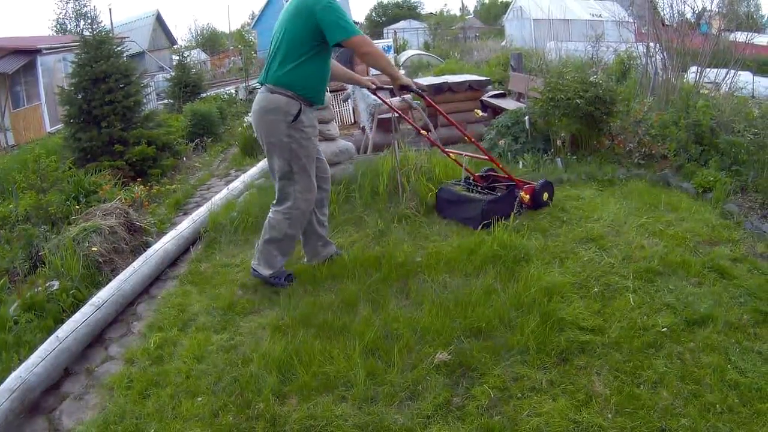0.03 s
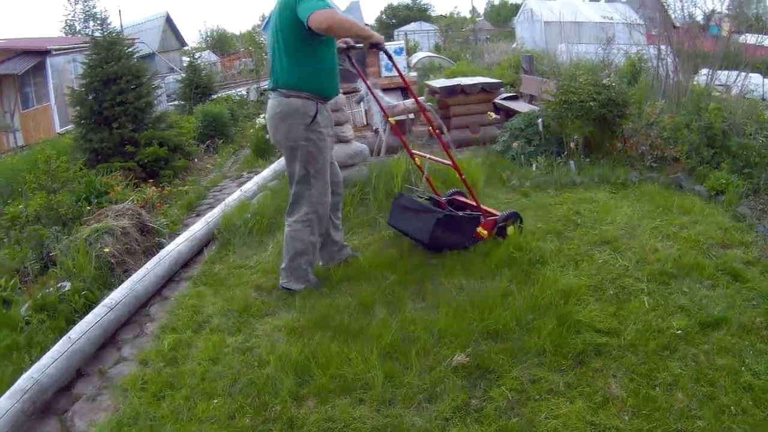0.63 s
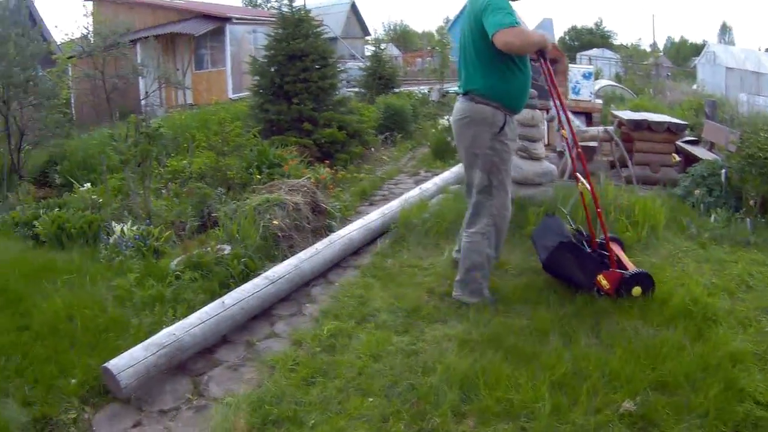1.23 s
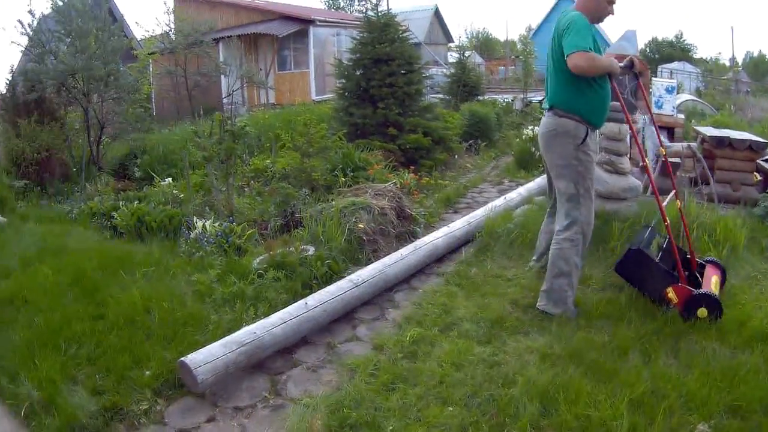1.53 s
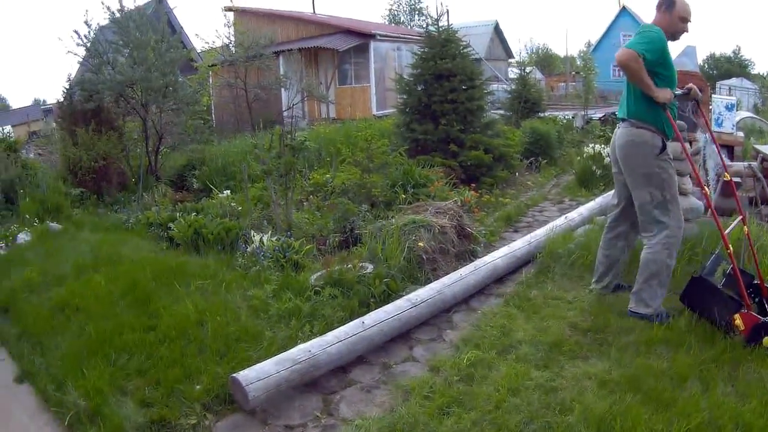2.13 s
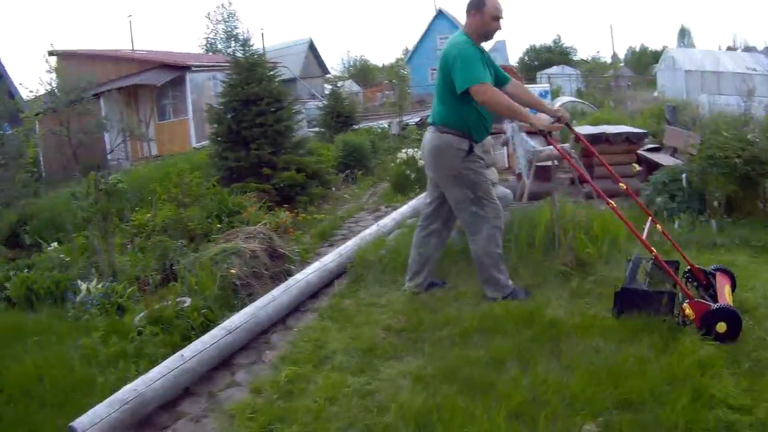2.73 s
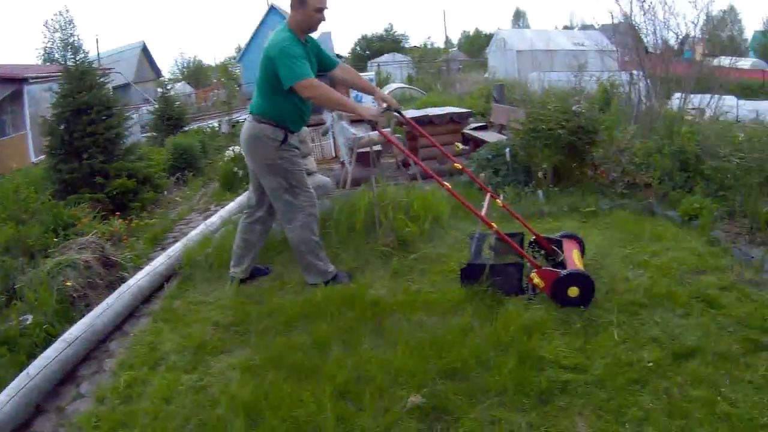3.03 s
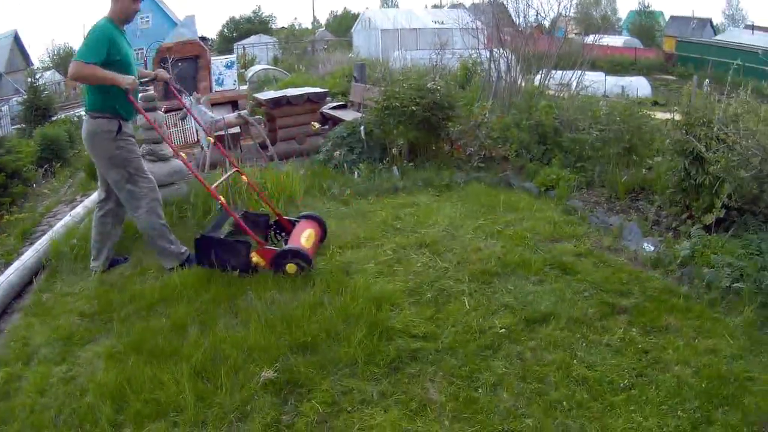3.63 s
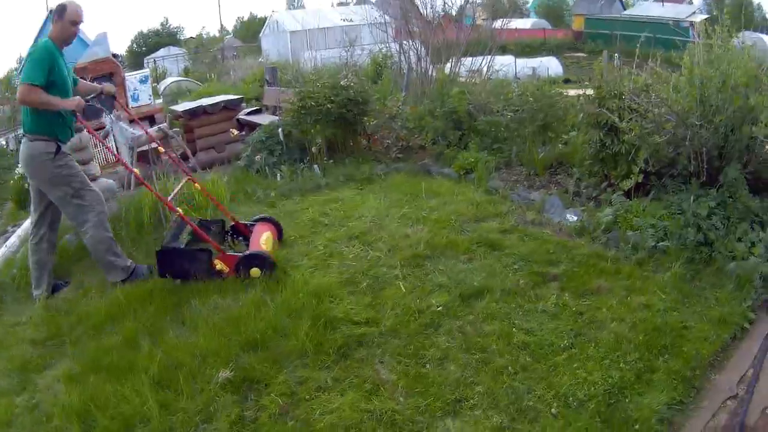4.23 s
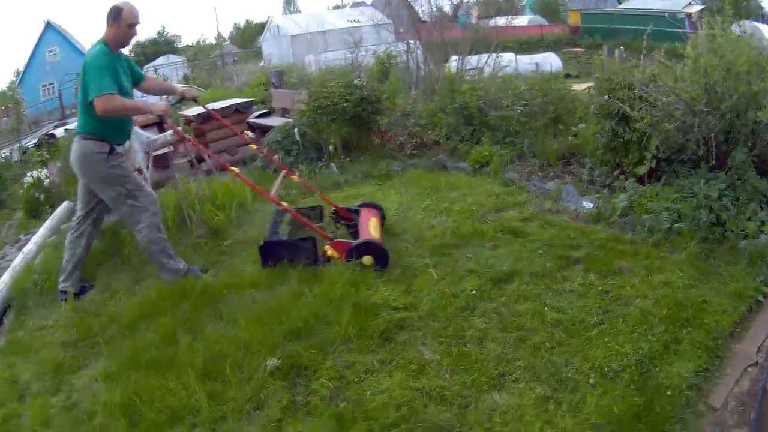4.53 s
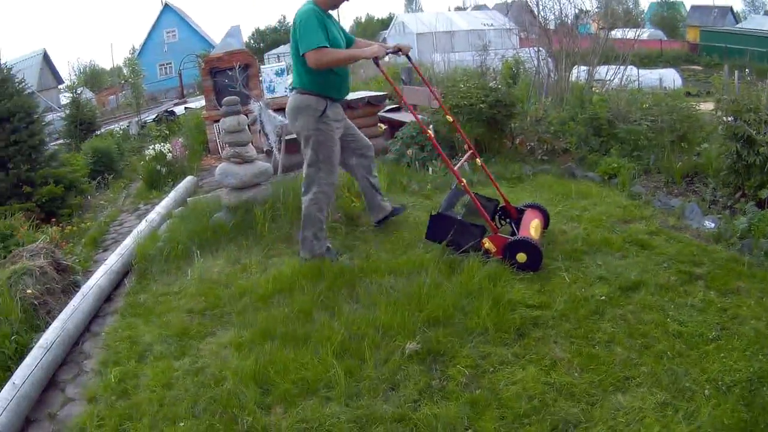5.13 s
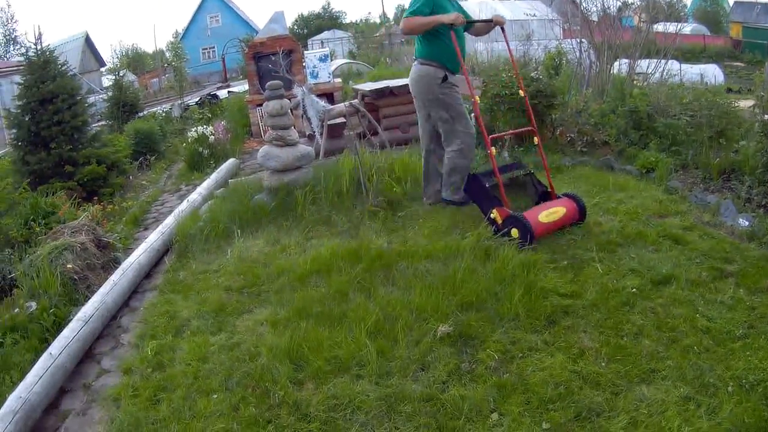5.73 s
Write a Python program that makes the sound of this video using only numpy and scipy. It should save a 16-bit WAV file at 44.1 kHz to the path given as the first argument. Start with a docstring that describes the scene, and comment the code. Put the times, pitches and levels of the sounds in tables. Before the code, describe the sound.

Short pushes of a manual reel mower: metallic blade scraping, rattling gears and ratchet clicks, with brief lulls between strokes.

```python
"""A hand-pushed reel mower on a quiet garden lawn, a few metres from a nearly mono microphone.
A puff of wind opens; then comes a first push: wheels and gears rattle the housing, the reel scrapes the
bed knife and snips grass. The mower pivots at 1.3 s, makes a long push from 2.2 s and coasts, its ratchet
clicking. It is drawn back at 3.5 s and pushed once more at 4 s, as wind touches the microphone again.
Ratchet and loose handle knock along the way, and a few last times as the mower comes to rest."""
import sys
import numpy as np
from scipy import signal
from scipy.fft import rfft, irfft
from scipy.io import wavfile
from scipy.ndimage import uniform_filter1d

SR = 44100
rng = np.random.default_rng(int(sys.argv[2]) if len(sys.argv) > 2 else 0)


def int16_out(signal):
    """Quantize to a 16-bit WAV file."""
    q = np.round(np.clip(np.atleast_2d(signal).T, -1, 1) * 32767)
    wavfile.write(sys.argv[1], SR, q.astype(np.int16))


N = 255780
TIME = np.arange(N) / SR
BINS = np.fft.rfftfreq(8192, 1 / SR)

# spectra of the garden's hush and of wind on the microphone: frequency_hz, gain_db
GARDEN_SPECTRUM = [(12, -36), (20, -7), (44, -5.5), (103, -10), (167, -16), (263, -14), (317, -13),
                   (812, -19), (1120, -14.5), (1280, -24), (5310, -26.5), (6760, -25.5), (12200, -27),
                   (15900, -73), (22000, -120)]
WIND_SPECTRUM = [(12, -14), (20, -3), (41, -0.5), (65, -8.5), (102, -6.5), (145, -17.5), (170, -5.5),
                 (220, -51), (370, -120)]
# wind reaching the microphone: start_s, relative_db
WIND_PUFFS = [(0.0, -46), (3.52, -59), (4.609, -44), (4.695, -45), (5.12, -65)]
# spectrum of the faint side signal: frequency_hz, side_over_mid_db
SIDE_SPECTRUM = [(300, -95), (600, -41.5), (1200, -13.5), (2200, -73), (4000, -23), (5300, -19.5),
                 (7000, -74)]

# mower and catcher brush the grass without cutting: start_s, length_s, level_db
GRASS_BRUSHES = [(0.0, 0.41, -66), (1.177, 0.1, -57), (1.991, 0.2, -59.5), (3.253, 0.46, -47.5),
                 (5.413, 0.57, -64)]
# the handle hits its stops or the ratchet catches: start_s, relative_clack_db, relative_thud_db
HANDLE_KNOCKS = [(0.87, -32.5, -51), (1.011, -51, -63.5), (1.564, -46.5, -45.5), (2.198, -53, -37),
                 (2.664, -27, -41), (2.794, -26, -32), (2.846, -24, -33), (3.355, -34.5, -55),
                 (3.511, -37, -36), (3.801, -36.5, -39.5), (4.054, -43, -41), (4.621, -34.5, -32),
                 (5.417, -53, -46), (5.467, -53.5, -52), (5.572, -42.5, -47), (5.626, -43.5, -43.5),
                 (5.759, -47.5, -51)]
# a blade bites a thick tuft: start_s, relative_blade_db, relative_jolt_db
TUFT_SNIPS = [(0.368, -33, -41), (0.424, -29, -30), (0.482, -27.5, -32.5), (0.5249, -26, -39),
              (0.6, -27.5, -36), (0.6614, -26, -41), (0.71, -21, -28), (0.832, -25.5, -39.5),
              (0.8644, -25.5, -44), (0.933, -34.5, -55), (2.336, -30.5, -29.5), (2.441, -27, -33),
              (2.545, -26, -33), (2.5782, -24, -39), (2.6934, -20.5, -26), (2.7728, -23.5, -20),
              (2.805, -27, -40), (2.955, -26, -33.5), (3.0564, -30.5, -40), (3.088, -30.5, -48),
              (3.131, -33, -43), (3.209, -32, -34), (3.522, -31, -34), (3.567, -25, -35),
              (3.628, -27, -30.5), (3.67, -25.5, -38), (3.7475, -24.5, -36), (3.777, -28, -35.5),
              (4.09, -28.5, -40), (4.29, -19, -31), (4.321, -21, -44), (4.362, -26, -38),
              (4.391, -22.5, -35), (4.4884, -20.5, -38)]
# blades passing the bed knife: time_s, passes_per_s
REEL_SPEED = [(0, 23), (.3, 23.5), (.6, 48), (.75, 40.5), (1.0, 18), (2.2, 18.7), (2.45, 30.6), (2.6, 65),
              (2.82, 40.7), (3.02, 26.4), (3.3, 17), (3.7, 31), (4.05, 21.6), (4.4, 49), (5, 40)]
# how hard the mower is driven, one curve a stroke: time_s, effort_db
FIRST_PUSH = [(0.0, -43), (0.038, -51.5), (0.306, -54.5), (0.416, -37.5), (0.536, -34), (0.634, -35),
              (0.676, -31.5), (0.854, -38.5), (0.87, -35), (0.922, -50.5), (0.93, -43.5), (1.1, -69)]
PIVOT = [(1.28, -65.5), (1.34, -43.5), (1.484, -43), (1.596, -58), (1.618, -50.5), (1.646, -45),
         (1.776, -61.5), (1.85, -77)]
LONG_PUSH = [(2.17, -66), (2.21, -50), (2.446, -31), (2.496, -37), (2.584, -25), (2.626, -29.5),
             (2.808, -30), (2.878, -36.5), (2.922, -28.5), (3.018, -40.5), (3.224, -40.5), (3.3, -51)]
DRAW_BACK = [(3.49, -47.5), (3.534, -36.5), (3.624, -40), (3.628, -36), (3.74, -39.5), (3.752, -35.5),
             (3.858, -46.5), (3.95, -67.5)]
LAST_PUSH = [(4.02, -58.5), (4.094, -33.5), (4.158, -35), (4.278, -28.5), (4.45, -31), (4.486, -28.5),
             (4.578, -34.5), (4.668, -35), (4.722, -43.5), (4.84, -41.5), (5.1, -81.5)]

# resonances of the mower's parts: pitch_hz, base_width_hz, gain_db
RATCHET_MODES = [(1010, 230, -9.5), (1280, 240, -1.5), (1680, 140, -15), (1900, 82, -3)]
HOUSING_MODES = [(213, 62, -9.5), (330, 54, -7), (506, 125, -9), (581, 60, -0.5), (621.4, 17, 5),
                 (898, 58, -6), (1116, 410, -10.5), (1323, 51, -3.5), (1500, 67, -10.5), (1713, 21, -7),
                 (1856, 31, -7.5), (2080, 37, -8), (2394, 37, -7.5), (2490, 38, -11.5), (2837, 11, -14)]
BLADE_MODES = [(3790, 40, -4), (3930, 60, -16), (4790, 39, -0.5), (4930, 54, -2.5), (5640, 130, -12),
               (6640, 280, -4.5), (7590, 160, -5), (8640, 54, -9), (8830, 180, -7), (9860, 230, -4.5),
               (10120, 70, -2), (10500, 110, -10), (11700, 160, -6)]
# colour of the scrape at the microphone, for each heading of the mower: frequency_hz, gain_db
AWAY = [(1530, -18.5), (2600, -4.5), (2790, -38), (3140, -9.5), (3690, -12.5), (4090, -1.5), (4650, -13),
        (5540, -2), (6640, -3), (7270, 3), (8120, -5.5), (8720, 2), (10200, -2), (11000, -7), (12200, -15),
        (15900, -26), (22000, -120)]
PIVOTING = [(1530, -18), (2600, 7.5), (2690, -15), (2850, -2), (3320, -10), (3620, -1), (4140, -6),
            (4810, -2), (5370, -5), (5760, 0), (6950, -2.5), (7910, -6), (10100, -8.5), (11700, -22),
            (12200, -16), (15900, -40), (22000, -120)]
TURNED = [(1530, -20.5), (2600, -7), (2960, -14), (3350, -10), (3880, -2.5), (4360, -8.5), (4810, -2.5),
          (5230, -8), (6600, -2), (7130, -6), (7660, -4), (8330, -9.5), (10000, 5.5), (11700, -2.5),
          (12200, -6), (15900, -13), (22000, -120)]
DRAWN_BACK = [(1530, -74), (2600, -26), (2790, -32), (3140, -21.5), (3860, -7), (4680, -13.5), (5870, -1),
              (6390, -8), (7560, -4.5), (8220, -11), (8770, -1.5), (9420, -4.5), (9600, 6.5), (10200, 4.5),
              (12200, -11.5), (15900, -30), (22000, -120)]
ACROSS = [(1530, -49), (2600, -5), (3000, -25), (3320, -16.5), (3830, -7), (4280, -9.5), (4780, -7),
          (5230, -7.5), (6350, -3), (7130, -6), (8280, -12), (9920, 4.5), (10900, -5), (11700, -4),
          (12200, -17), (15900, -36), (22000, -120)]
# each heading turns other parts to the microphone:
# start_s, colour, boom_db, gears_db, scrape_db, sheen_db, whirr_db
HEADINGS = [(0, AWAY, -5.5, -3, 0, 0, -0.5), (1.15, PIVOTING, 4.5, 1, 1, -3, -2),
            (2.15, TURNED, 3.5, 2, 0, -4.5, 2), (3.2, DRAWN_BACK, -3, -2.5, 0, -1, -15),
            (3.97, ACROSS, -1, -0.5, -0.5, -1, -5.5)]

# how each part follows the effort: firm_push_db, db_per_effort_db
WHEELS, BUMPS, GEARS = (-49.5, 0.7), (-43.7, 1), (-41.5, 0.97)
SCRAPE, SHEEN, PINIONS = (-40, 1.13), (-40, 1), (-51, 1)


def amp(db):
    """Decibels to gain."""
    return 10 ** (np.asarray(db) / 20)


def unit_rms(x):
    """Scales to rms 1."""
    return x / np.sqrt(np.mean(x ** 2) + 1e-20)


def spectrum(points, hz=BINS):
    """A spectrum table as gain at the given frequencies."""
    points_hz, db = np.transpose(points)
    return amp(np.interp(np.log(hz + 1), np.log(points_hz + 1), db))


def ringing(modes, widen):
    """Summed gain of a set of resonances, their widths multiplied by widen."""
    powers = (amp(db) ** 2 / (1 + (2 * (BINS - hz) / (width * widen)) ** 2) for hz, width, db in modes)
    return np.sqrt(sum(powers))


def below(edge_hz, order):
    """Gain of a low-pass."""
    return 1 / np.sqrt(1 + (BINS / edge_hz) ** (2 * order))


def above(edge_hz, order):
    """Gain of a high-pass."""
    return np.sqrt(1 - below(edge_hz, order) ** 2)


def through(x, gain):
    """Causal filter of unit energy: resonances ring after each blow."""
    log_gain = np.log(np.maximum(gain / gain.max(), 1e-5))
    mirrored = np.concatenate([log_gain, log_gain[-2:0:-1]])
    minimum_phase = np.exp(np.conj(signal.hilbert(mirrored)))
    response = np.fft.ifft(minimum_phase).real[:len(BINS)]
    return signal.oaconvolve(x, response / np.linalg.norm(response))[:N]


def wander(rate_hz):
    """Random drift of rms 1, mostly slower than rate_hz."""
    hz = np.fft.rfftfreq(N, 1 / SR)
    return unit_rms(irfft(rfft(rng.standard_normal(N)) / (1 + (hz / rate_hz) ** 4), N))


def grains(per_s, spread_db, smooth):
    """Tiny impacts of scattered size over a share of smooth friction noise."""
    sizes = amp(spread_db * np.minimum(rng.exponential(1, N), 3)) * rng.choice([-1, 1], N)
    impacts = unit_rms(sizes * (rng.random(N) < per_s / SR))
    return unit_rms(impacts + smooth * rng.standard_normal(N))


def pulses(starts_s, levels_db, length_s, rise_s, order):
    """Envelope of pulses that rise quickly and let go, more abruptly at a higher order."""
    power = np.zeros(N)
    for start, db, length in np.broadcast(starts_s, levels_db, length_s):
        span = slice(max(round(start * SR), 0), round(start * SR) + SR // 2)
        age = np.maximum(TIME[span] - start, 0)
        shape = (1 - np.exp(-age / rise_s)) * np.exp(-(age / max(length, rise_s)) ** order)
        power[span] += (amp(db) * shape / (shape.max() + 1e-12)) ** 2
    return np.sqrt(power)


def garden_air():
    """Low puffs of wind on the microphone, over the steady hush of the garden."""
    gusts = pulses(*np.transpose(WIND_PUFFS), length_s=0.052, rise_s=0.0044, order=1)
    wind = amp(5) * gusts * through(rng.standard_normal(N), spectrum(WIND_SPECTRUM))
    hush = amp(-64) * through(rng.standard_normal(N), spectrum(GARDEN_SPECTRUM))
    return wind + hush


def grass_brushing():
    """Grass swishes along the catcher: a thin, high, uneven rustle."""
    start_s, length_s, level_db = np.transpose(GRASS_BRUSHES)
    contact = pulses(start_s, level_db, length_s, rise_s=0.0016, order=4)
    swish = contact * grains(per_s=1700, spread_db=4.5, smooth=0.4) * amp(2 * wander(30))
    return through(swish, above(8800, order=12) + above(4500, order=2))


def pawl_clicks(start_s, count, first_gap_s=0.032, slowing=0.06, fade_db_per_s=60):
    """Times and levels of the pawl clicking over the coasting reel, ever slower and softer."""
    age = first_gap_s * ((1 + slowing) ** np.arange(count) - 1) / slowing
    return start_s + age, -34.5 - fade_db_per_s * age


def knocks():
    """The pawl drops and the handle hits its stops: a dry clack and a thud of the deck."""
    start_s, clack_db, thud_db = np.transpose(HANDLE_KNOCKS)
    all_clacks = np.hstack([(start_s, clack_db), pawl_clicks(start_s=3.172, count=5)])
    clack = pulses(*all_clacks, length_s=0.0098, rise_s=0.00067, order=1) * rng.standard_normal(N)
    thud = pulses(start_s, thud_db, length_s=0.017, rise_s=0.0014, order=1) * rng.standard_normal(N)
    pawl = ringing(RATCHET_MODES, widen=0.91) * below(1900, order=2) * above(500, order=3)
    deck = ringing(HOUSING_MODES, widen=0.71) * below(470, order=2) * above(237, order=3)
    return amp(-4) * (through(clack, pawl) + through(thud, deck))


def effort(firm_db=-35, rest_db=-72):
    """Effort along the strokes, in dB against a firm push."""
    time_s, effort_db = np.vstack([FIRST_PUSH, PIVOT, LONG_PUSH, DRAW_BACK, LAST_PUSH]).T
    return np.interp(TIME, time_s, effort_db, right=rest_db) - firm_db


def heading():
    """Which way the mower faces at each moment, as a row number of HEADINGS."""
    return np.searchsorted([row[0] for row in HEADINGS[1:]], TIME)


def drives(push_db):
    """Gain of each moving part, from the effort and (wheels apart) the heading."""
    stepped_db = np.array([row[2:] for row in HEADINGS], float)[heading()]
    facing_db = uniform_filter1d(stepped_db, size=4000, axis=0).T
    parts = zip([WHEELS, BUMPS, GEARS, SCRAPE, SHEEN, PINIONS], [0, *facing_db])
    return [amp(db + slope * push_db + turn_db) for (db, slope), turn_db in parts]


def reel_speed():
    """Blade passes per second."""
    return np.interp(TIME, *np.transpose(REEL_SPEED))


def pinion_whirr(drive, base_hz=1441, cycles_per_pass=14, width_hz=94):
    """Loose pinion teeth mesh unevenly: a fuzzy tone that rises with the speed of the reel."""
    phase = 2 * np.pi * np.cumsum(base_hz + cycles_per_pass * reel_speed()) / SR
    return drive * (wander(width_hz) * np.cos(phase) + wander(width_hz) * np.sin(phase))


def housing(wheels, bumps, gears, jolts):
    """Wheels rumble, bumps boom in the hollow deck, gear teeth and blade jolts clatter higher up."""
    body = ringing(HOUSING_MODES, widen=1) * below(3460, order=7) * above(134, order=4)
    rolling = wheels * grains(per_s=900, spread_db=2, smooth=0.32)
    bumping = bumps * grains(per_s=700, spread_db=2.6, smooth=0.83) * amp(2.08 * wander(42))
    teeth = np.hypot(gears, amp(-7) * jolts) * grains(per_s=1400, spread_db=2.2, smooth=0.59)
    rumble = through(rolling, body * below(430, order=6))
    boom = through(bumping, body * above(456, order=7) * below(713, order=8))
    clatter = through(teeth, body * above(737, order=8))
    return rumble + boom + clatter


def snips(push_db, stalk_db=-31.5, scatter_db=2):
    """Force of the cuts on blade and gears: thick tufts, and thin stalks at every blade pass."""
    passes = np.cumsum(reel_speed()) / SR
    cuts = np.flatnonzero(np.diff(np.floor(passes)))
    cut_db = stalk_db + push_db[cuts] + scatter_db * rng.standard_normal(N)[:len(cuts)]
    stalks = pulses(TIME[cuts], cut_db, length_s=0.0067, rise_s=0.00033, order=2)
    start_s, blade_db, jolt_db = np.transpose(TUFT_SNIPS)
    tufts, jolts = [pulses(start_s, db, length_s=0.01, rise_s=0.00033, order=2)
                    for db in (blade_db, jolt_db)]
    return np.hypot(stalks, tufts), jolts


def blade_passes(depth, uneven):
    """Each blade meets the bed knife hard and slides off; no two press alike."""
    passes = np.cumsum(reel_speed()) / SR
    pressure = 1 + uneven * rng.standard_normal(N)[passes.astype(int)]
    contact = np.exp(depth * pressure * (0.5 - passes % 1))
    return unit_rms(uniform_filter1d(contact, size=40))


def sliding(x, patchy_db):
    """The contact point runs along the blade, so the bands swell and fade in patches."""
    bands = signal.stft(x, nperseg=256, noverlap=192)[2]
    drift = uniform_filter1d(rng.standard_normal(bands.shape), size=12, axis=1)
    patches = unit_rms(uniform_filter1d(drift, size=4, axis=0))
    swell = unit_rms(amp(patchy_db * patches))
    return signal.istft(bands * swell, nperseg=256, noverlap=192)[1][:N]


def reel(scrape, sheen, bites):
    """Steel slides on steel and stalks snap; the blades ring, coloured by the heading of the mower."""
    steel = np.hypot(1, amp(10) * ringing(BLADE_MODES, widen=0.37))
    steel /= uniform_filter1d(steel, size=130)  # fine peaks only: the heading sets the broad balance
    rub = np.hypot(scrape, amp(-8) * bites) * grains(per_s=4000, spread_db=1, smooth=0.66)
    fizz = np.hypot(sheen, amp(-10.5) * bites) * grains(per_s=3500, spread_db=4.7, smooth=0.99)
    fizz *= amp(1.63 * wander(140))  # the treble flickers
    facing = heading()
    blades = np.zeros(N)
    for row, (_, colour, *_) in enumerate(HEADINGS):
        crossfade = np.sqrt(abs(uniform_filter1d(1.0 * (facing == row), size=4000)))
        gain = steel * spectrum(colour)
        blades += through(crossfade * rub, gain * below(9350, order=16))
        blades += through(crossfade * fizz, gain * above(9580, order=16))
    return blades


def slight_width(mid, side_lag_s):
    """Nearly mono sound, with a faint delayed side signal adding a little stereo width."""
    hz = np.fft.rfftfreq(N, 1 / SR)
    delay = np.exp(-2j * np.pi * hz * side_lag_s)
    side = irfft(rfft(mid) * spectrum(SIDE_SPECTRUM, hz) * delay, N)
    return np.array([mid + side, mid - side])


def scene():
    """The mower at work in the open garden, a few metres from the microphone."""
    push_db = effort()
    wheels, bumps, gears, scrape, sheen, pinions = drives(push_db)
    bites, jolts = snips(push_db)
    chop = blade_passes(depth=0.24, uneven=0.42)  # the passing blades chop the friction
    blades = sliding(reel(scrape * chop, sheen * chop, bites), patchy_db=3)
    deck = sliding(housing(wheels, bumps, gears * chop, jolts), patchy_db=1.37)
    mower = blades + deck + pinion_whirr(pinions) + knocks() + grass_brushing()
    return slight_width(mower + garden_air(), side_lag_s=0.016)


def record(dry):
    """The treble cuts off steeply at 12.2 kHz."""
    low_pass = signal.firwin(601, 12200, window=("kaiser", 9), fs=SR)
    return signal.oaconvolve(dry, low_pass[None], "same")


dry = scene()
out = record(dry)
int16_out(out)
```